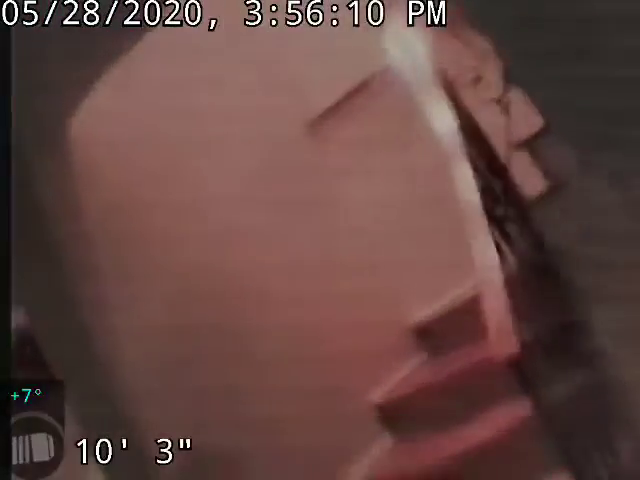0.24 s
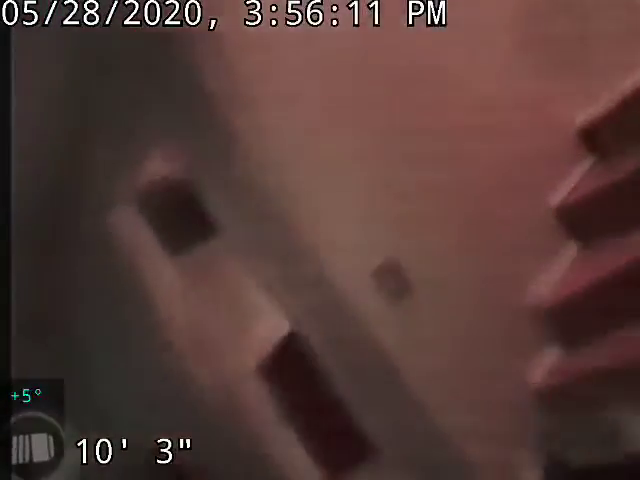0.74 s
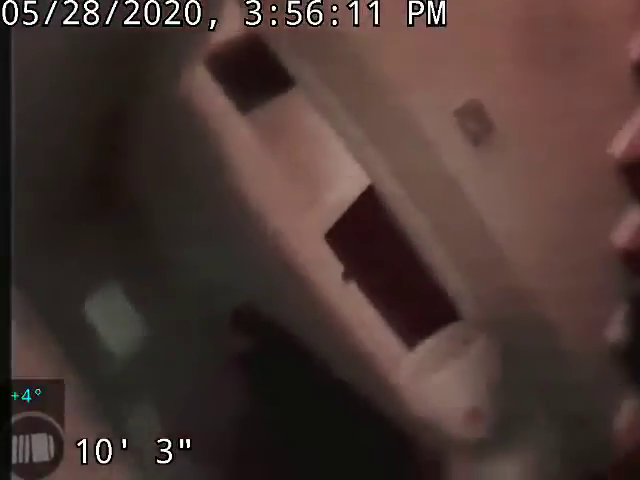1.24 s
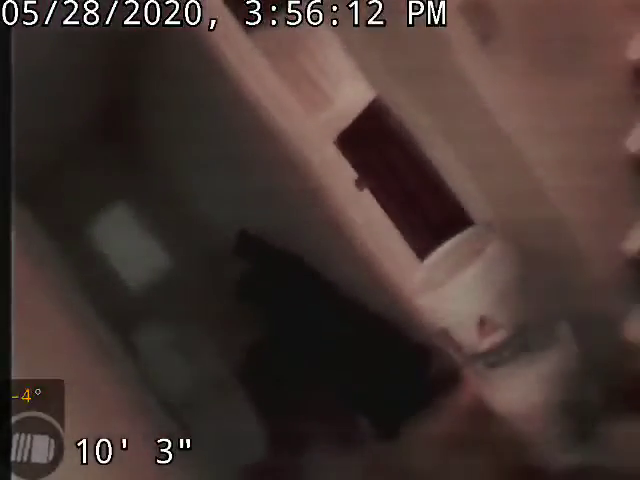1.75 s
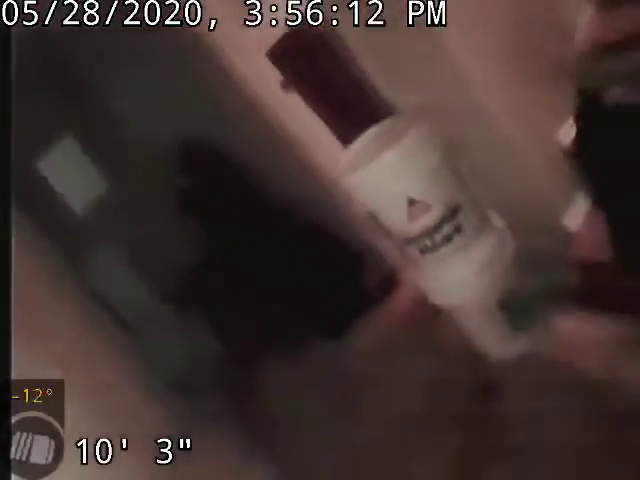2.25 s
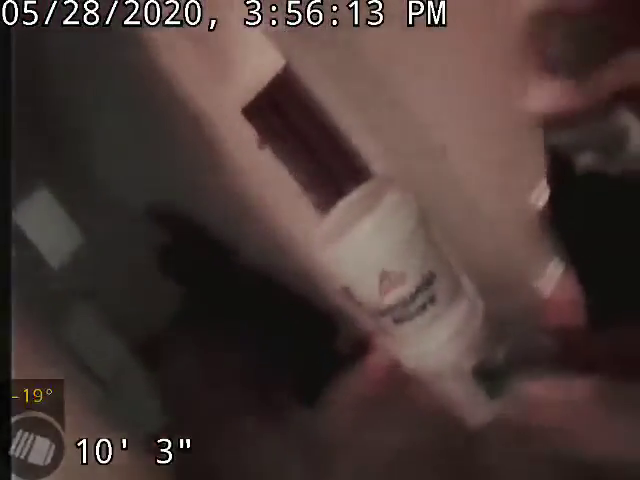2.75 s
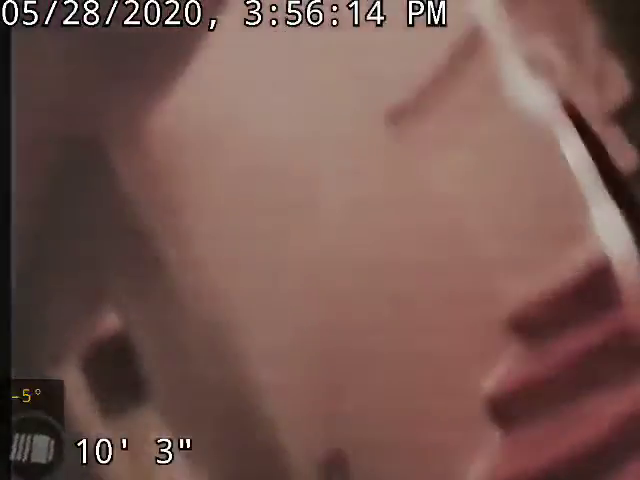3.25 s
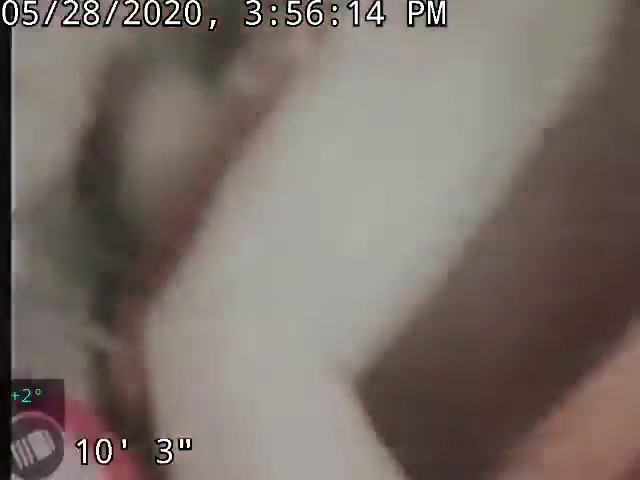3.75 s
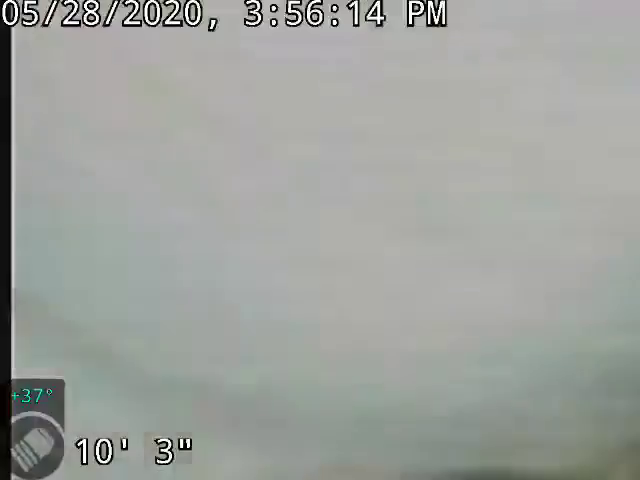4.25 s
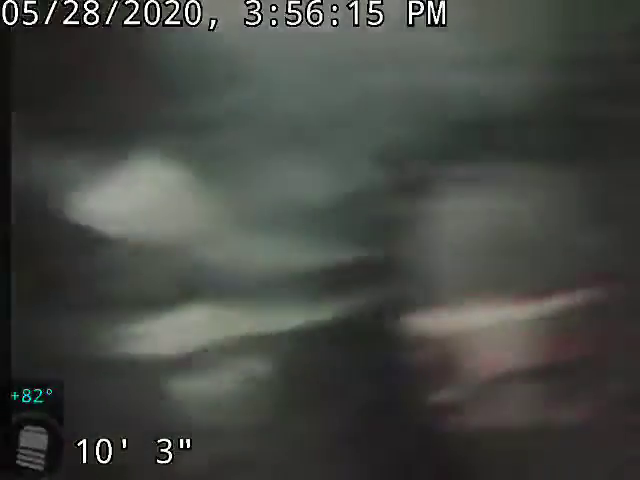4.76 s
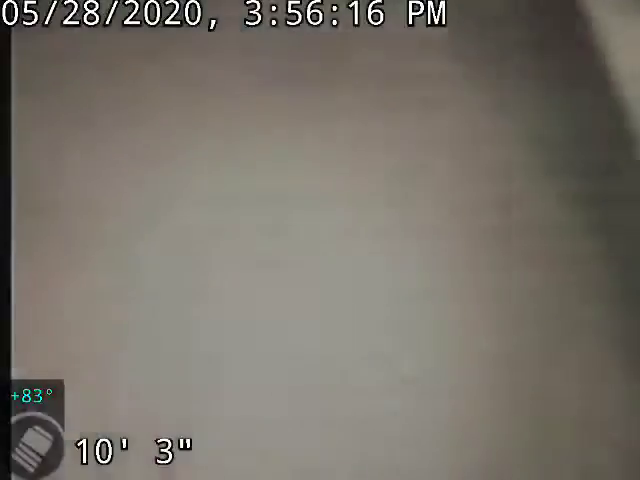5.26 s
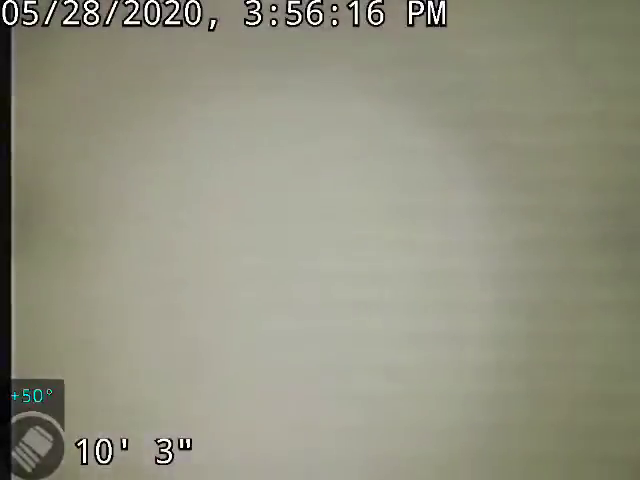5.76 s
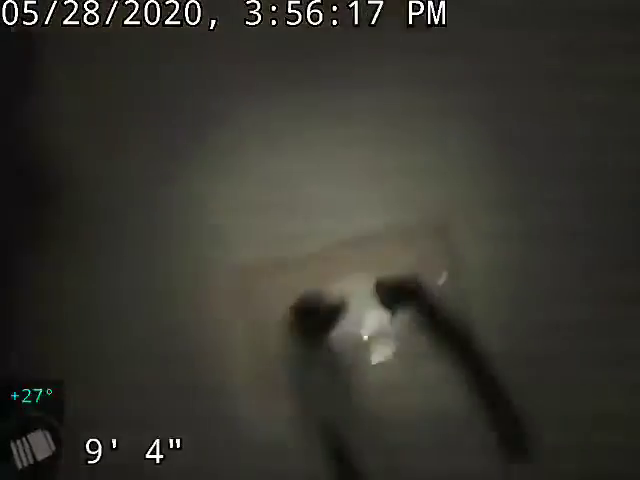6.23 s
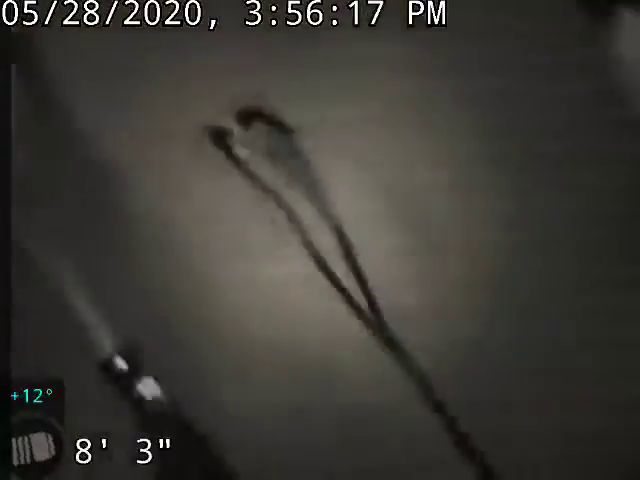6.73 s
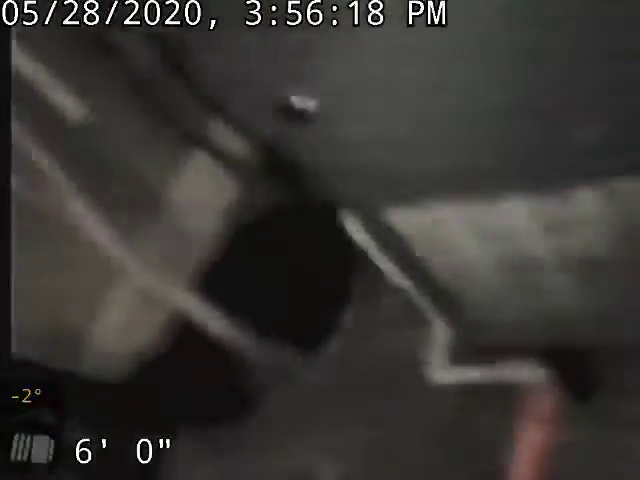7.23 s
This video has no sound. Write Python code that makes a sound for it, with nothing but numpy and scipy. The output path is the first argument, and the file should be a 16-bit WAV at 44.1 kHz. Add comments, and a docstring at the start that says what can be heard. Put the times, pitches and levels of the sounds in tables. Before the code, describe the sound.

A quiet basement room with low mains hum and faint hiss. Tiny dry creaks, then a short dull knock with a brief rattle. After a near-silent pause with small ticks, a stiff cable crashes hard, booming and clattering, and its rumble dies away. Finally the cable is dragged in, rattling, scraping and knocking with growing hiss. One close microphone, dull and bass-heavy.

```python
"""A stiff push cable is handled and dragged back in a quiet basement room, heard at one microphone.
Small creaks and a knock come first, then a heavy, booming crash; the cable scrapes, rattles
and knocks as it is hauled in. Random contacts drive its resonances and noise bands, and decaying
sines make the knocks. Noise makes the boom, ticks, creaks and a faint whirr; mains hum, rumble and
hiss lie behind."""
import sys
import numpy as np
from scipy import signal
from scipy.io import wavfile
from scipy.ndimage import uniform_filter1d

SR = 44100
rng = np.random.default_rng(int(sys.argv[2]) if len(sys.argv) > 2 else 0)


def store_wav(level_fs):
    """Save 16-bit WAV to argv[1]."""
    pcm = np.round(np.clip(np.atleast_2d(level_fs), -1, 1) * 32767)
    wavfile.write(sys.argv[1], SR, pcm.T.astype(np.int16))


N = 330309   # samples, about 7.5 s

# Jolts, after which the cable shakes on and dies away: [t/s, basic t60/s, rattle level/dB,
# rattle centre/octaves above 100 Hz, scrape level/dB, brightness/dB]
JOLTS = [(2.461, 0.38, -30, 1.5, -40.5, -24), (3.45, 0.94, -63, .15, -86, 5),
         (4.241, 1.16, -24, 1.37, -32.5, -4.5), (4.321, 0.77, -23.5, 1.37, -34.5, -6.5),
         (4.695, 1.5, -60, .1, -61, 3), (4.985, 0.48, -48.5, 1.37, -64.5, 9),
         (5.615, 0.28, -47.5, 0.62, -86.5, 5), (6.105, .55, -34, 1.1, -50, -5.6),
         (6.222, 0.41, -30, 1.9, -35, -14.5), (6.262, .45, -31, .6, -53, 0.2),
         (6.509, 0.93, -34, 1.1, -49, -16), (6.994, .6, -34.5, .9, -49, 0.2),
         (7.166, 0.88, -33, 1.83, -44.5, -14)]
# Swells of rattle and scrape, including the lead-in and tail of the crash: [peak t/s, rise/s for 20 dB,
# fall/s for 20 dB (the same for all parts), rattle level/dB, rattle centre/octaves above 100 Hz,
# scrape level/dB, brightness/dB]
SWELLS = [(2.454, 0.04, 0.06, -41.5, 2.5, -57.5, -19), (2.546, 0.05, .07, -53, 1.5, -63.5, 5.5),
          (2.65, .12, .17, -67, 2.5, -81, -6.5), (3.07, 0.05, .21, -66.5, 0.56, -86.5, 15.5),
          (3.42, .4, .35, -71, 1.7, -83, 9), (3.88, 0.37, 0.3, -64.5, 1.94, -70, 9),
          (4.15, 0.36, .15, -71, 1.55, -84, 9), (4.371, .075, 0.0838, -20.5, 2.45, -31.5, -0.3),
          (4.47, .1, .22, -29, 1.1, -51, -5.5), (4.63, 0.23, .48, -31, -.5, -80, 3.2),
          (4.81, 0.23, .36, -64, .36, -58.5, .5), (5.04, 0.45, .2, -61.5, 1.5, -68, 3),
          (5.26, .12, .2, -63, 1.0, -66, -3), (5.45, .22, .185, -53, 1.9, -52.5, 4.7),
          (5.68, 0.12, 0.4, -61, 1.3, -65.5, 4), (5.88, .16, 0.33, -49, 1.4, -57, 4.5),
          (5.97, 0.1645, 0.16, -41.5, 0.8, -59, 6), (6.17, 0.23, 0.6, -42.5, 1.16, -53, 3),
          (6.4, 0.2645, 0.3, -44.5, 1.17, -48.5, 1.7), (6.599, 0.27, 0.23, -38.5, 1.6, -48.5, -6),
          (6.71, 0.2, 0.27, -32, 1.28, -58, 2), (6.85, 0.23, .25, -42, 2.0, -49.5, -3.7),
          (7.1, .16, .085, -39.5, 2.6, -40.5, 8.1), (7.31, 0.25, 0.15, -36, 1.73, -40.5, 2),
          (7.47, 0.6, 5, -53, 2.25, -53, 1)]
# Low, middle and high rattle answering a move: [centre f/Hz, level/dB, share of a jolt's basic t60]
RATTLE_PARTS = [(166.5, 0.8, 1.08), (324, -2.5, 0.84), (601, 0, 0.69)]
# Scrape, hiss and top hiss answering a move: [level/dB, share of the brightness, share of a jolt's basic t60]
RUB_PARTS = [(0.08, 0.0105, 0.49), (-6.5, 0.44, 0.56), (-10, 1.04, 0.55)]
# Tension of the hauled cable, lifting its sharp modes: [t/s, lift/dB]
TENSION = [(5.6, 2), (5.899, 6)]
# Low rumbling boom of the handling: [t/s, level/dB]
BOOM_LEVEL = [(2.34, -66), (2.43, -53), (2.56, -65), (2.8, -83), (2.96, -74), (3.2, -77), (3.45, -56),
              (4.226, -59), (4.244, -26), (4.32, -23.5), (4.45, -28.5), (4.62, -30.5), (4.97, -45),
              (4.99, -38.5), (5.169, -51), (5.62, -60), (5.72, -55), (5.89, -62), (6.15, -50), (6.225, -35),
              (6.38, -48.5), (6.7, -56), (6.95, -52), (6.99, -37), (7.035, -37.5), (7.1, -46), (7.16, -36),
              (7.31, -51.5), (7.49, -48)]
# Bending modes of the cable: [f/Hz, width/Hz, relative level/dB]
CABLE_MODES = [(129.8, 39, -4), (170, 18.6, -1), (247, 118, -8.5), (322, 19.7, -4.5), (405, 106, -7.5),
               (484.2, 15, -9), (553, 85, -5), (646.4, 31, -5), (732, 98, -10.5), (1000, 550, -22.5)]
# Low resonances of the boom: [f/Hz, width/Hz, relative level/dB]
BOOM_MODES = [(55.3, 17.2, 5), (78.3, 34.2, 0.5), (106.2, 21.3, -1)]
# Sheath and housing modes that sing in the scrape: [f/Hz, width/Hz, relative level/dB]
SHEATH_MODES = [(1124, 100, 1.5), (1375, 79, 2.5), (1511, 68, 6.5), (1750, 40, -1), (2124, 370, -20.5),
                (2730, 220, -4.5), (3087, 160, -4), (3780, 260, -8), (4460, 73, -10)]
# Colour of the scrape: [f/Hz, relative level/dB per Hz]
SCRAPE_COLOUR = [(700, -6), (1000, -9), (1600, -5), (2600, -7), (3800, -14), (5500, -29), (8000, -29)]
# Colour of the rubbing hiss: [f/Hz, relative level/dB per Hz]
HISS_COLOUR = [(3200, -2.5), (5000, -5), (7500, -9.5), (8600, -5.5), (10000, -10), (13300, -3.5),
               (14100, -6)]
# Knocks of the cable: [t/s, ring peak level/dB, favoured f/Hz, ring t60/s at that f, crack level/dB re ring]
KNOCKS = [(0.755, -61, 440, 0.28, -14), (2.409, -64, 687, .1, -18), (2.437, -36, 550, 0.1, -18),
          (2.459, -22, 560, 0.11, -6), (3.46, -36, 148, 0.1, -45), (3.652, -47, 326, 0.13, -45),
          (4.237, -25, 130, 0.19, -7.5), (4.324, -17.5, 203, 0.055, 1.5), (4.364, -10.5, 637, 0.21, -5.5),
          (4.392, -9, 179, 0.071, -10), (4.987, -37, 550, 0.13, -21.5), (5.613, -33.5, 231, 0.12, -38),
          (5.978, -25.5, 130, 0.26, -29), (6.103, -32, 400, 0.17, -22), (6.123, -25, 198, 0.21, -10),
          (6.216, -35, 504, 0.064, 13), (6.224, -20, 320, 0.19, -5), (6.296, -19.5, 333, 0.048, -22),
          (6.508, -17.5, 332, 0.056, -10.5), (6.512, -26.5, 166, .2, -30), (6.670, -18, 270, .04, -30),
          (6.69, -27, 198, 0.17, -25), (6.742, -22.5, 320, .05, -25), (6.994, -23.5, 540, 0.063, -20),
          (7.165, -21.5, 133, 0.056, -7)]
# Small creaks, each a hissy ring in one band: [t/s, ring level/dB, f/Hz, width/Hz, t60/s]
CREAKS = [(0.026, -70, 3300, 2000, 0.24), (0.031, -74.5, 8350, 2010, 0.46), (.088, -72.5, 6100, 600, 0.31),
          (0.134, -64, 3630, 200, 0.23), (0.169, -60, 5900, 1180, 0.15), (.2, -75, 4130, 503, 0.33),
          (0.391, -71.5, 8100, 1500, 0.26), (0.753, -70.5, 2530, 3700, 0.28),
          (0.758, -73, 8000, 3040, 0.31), (0.824, -74, 3670, 400, 0.29), (0.954, -62, 3680, 221, 0.19),
          (1.008, -68.5, 6200, 815, 0.24), (1.206, -68.5, 10100, 5130, .2), (1.369, -75, 8350, 2000, 0.19),
          (1.455, -79, 11500, 2500, .25), (1.784, -75, 4900, 700, .25), (2.189, -77, 5400, 800, 0.17),
          (2.345, -84, 4170, 300, 0.44), (2.61, -56.5, 3590, 250, 0.13), (2.836, -76, 3950, 450, 0.36),
          (2.961, -78, 10500, 4030, 0.79), (3.44, -77, 4400, 500, 0.49), (3.52, -73, 7170, 700, 0.29),
          (4.325, -26, 1370, 895, 0.11), (4.364, -27, 4370, 250, 0.056), (4.695, -48.5, 2560, 302, 0.16),
          (4.698, -57.5, 3570, 377, 0.091)]
# Sharp ticks: [t/s, peak level/dB, low edge f/Hz]
TICKS = [(0.8974, -66, 7000), (3.054, -51, 7000), (3.308, -53, 7100), (3.3797, -58, 7000),
         (3.6306, -51, 7000), (3.723, -46, 7000), (3.7569, -46, 7000), (3.8132, -48, 7000),
         (4.019, -49, 7000), (5.7007, -37, 1500), (5.9574, -35, 7000), (5.975, -29, 7200),
         (7.17, -24, 2800), (7.1844, -43, 2800)]
# Faint whirring band near 1.1 kHz: [t/s, level/dB]
WHIRR_LEVEL = [(3.0, -100), (3.2, -84.5), (3.6, -84.5), (3.8, -82), (3.95, -69), (4.201, -77.5),
               (4.26, -100)]
# Mains lines: [f/Hz, middle rms level/dB, waver/dB]
HUM = [(59.5, -60, 1.5), (120, -77, 1.5), (178, -81, 1.5), (716, -92, 1.5)]
# Colour of the room's rumble and the preamplifier's hiss: [f/Hz, relative level/dB per Hz]
FLOOR_COLOUR = [(13, -32), (22, -19.5), (43, -8.5), (70, -9), (108, -6.5), (161, -10.5), (308, -24),
                (437, -40), (637, -32), (709, -33), (979, -41.5), (3570, -44.5), (5340, -47),
                (11700, -47.5), (13700, -46.5)]

JOLT_RISE_S = 0.0039   # for 20 dB
SWELL_ROUNDNESS = 1.43   # 1 = pointed peak, 2 = bell
RATTLE_FOCUS_DB = 7.5   # loss per octave away from the rattle centre
CREAK_SNAP_DB, SNAP_T60_S = -4.5, 0.0088   # noise of the snap before its filters, re the ring
FLOOR_DB = -67
MIC_LOW_HZ, CUTOFF_HZ = 42.4, 14300   # bass corner; edge above which the treble is 65 dB down


def drag():
    """Handling booms low down, slips shake the cable modes, and the sheath scrapes and hisses."""
    low, middle, high, rub, sizzle, top = motion()
    t = np.arange(N) / SR
    boom = from_db(np.interp(t, *np.transpose(BOOM_LEVEL), left=-120))
    thud = low_pass(boom * boom_tone(), 235)

    taut_db = np.interp(t, *np.transpose(TENSION))
    slips = grains(700.0, spread_db=1.0)
    low_modes = body(slips, CABLE_MODES[:3], wander_db=1.1, taut_db=taut_db)
    low_modes = rms_one(low_pass(low_modes, 320))
    middle_modes = body(slips, CABLE_MODES[3:5], wander_db=2.6, taut_db=taut_db)
    middle_modes = rms_one(resonate(middle_modes, 293, 225))
    high_modes = body(slips, CABLE_MODES[5:], wander_db=2.5, taut_db=taut_db)
    high_modes = rms_one(high_pass(high_modes, 357))
    rattle = low * low_modes + middle * middle_modes + high * high_modes
    rattle = low_pass(rattle, 1830)   # soft contacts: little treble

    judder = drift(20.0)   # stick and slip throbs scrape and hiss together
    grit = [grains(1800.0, spread_db=2.0) for _ in range(2)]
    singing = body(grit[0], SHEATH_MODES, wander_db=1.0)
    scrape = coloured(grit, SCRAPE_COLOUR, patchy_db=1.5) + 0.52 * singing
    scrape = rub * rms_one(high_pass(scrape, 960))

    fine_grit = [grains(9000.0, spread_db=2.5) for _ in range(2)]
    hiss = coloured(fine_grit, HISS_COLOUR, patchy_db=1.77)
    hiss = sizzle * rms_one(low_pass(hiss, 8420)) + top * rms_one(high_pass(hiss, 9200))
    return thud + rattle + from_db(0.99 * judder) * scrape + from_db(0.35 * judder) * hiss


def motion():
    """Gains of three rattle and three rubbing parts: every move rises, peaks and fades; powers add."""
    centre_hz, rattle_db, rattle_lasts = np.transpose(RATTLE_PARTS)
    rub_db, follows, rub_lasts = np.transpose(RUB_PARTS)
    centre = np.log2(centre_hz / 100)
    lasts = np.concatenate([rattle_lasts, rub_lasts])[:, None]
    # a jolt's t60 covers three falls of 20 dB; its fall is straight in dB
    moves = [(s, JOLT_RISE_S, t60 / 3 * lasts, *rest, 1) for s, t60, *rest in JOLTS]
    # a swell's fall is the same for all parts
    moves += [(*swell, SWELL_ROUNDNESS) for swell in SWELLS]
    t = np.arange(0, N + 32, 32) / SR   # every 32nd sample is enough
    power = 0
    for s, rise, fall, shake_db, octave, scrape_db, bright_db, roundness in moves:
        rattle_peak_db = shake_db + rattle_db - RATTLE_FOCUS_DB * np.abs(centre - octave)
        rub_peak_db = scrape_db + rub_db + follows * bright_db
        peak_db = np.concatenate([rattle_peak_db, rub_peak_db])
        before = (s - t) / np.maximum(rise, 1e-3)
        after = (t - s) / np.maximum(fall, 1e-3)
        shape_db = -20 * np.maximum(before, after) ** roundness
        power = power + from_db(peak_db[:, None] + shape_db) ** 2
    return [np.interp(np.arange(N) / SR, t, part) for part in np.sqrt(power)]


def boom_tone():
    """Low resonances under a steady shaking by noise, their slow swells half evened out."""
    ring = body(rng.standard_normal(N), BOOM_MODES, wander_db=.5)
    swell_power = uniform_filter1d(ring ** 2, size=SR // 12) + 1e-3
    return rms_one(ring / swell_power ** .25)


def knocks():
    """Each blow rings the cable modes near its favoured pitch and cracks the sheath modes briefly."""
    out, t = np.zeros(N), np.arange(SR // 3) / SR
    hz, _, mode_db = np.transpose(CABLE_MODES)
    thin_hz, _, thin_db = np.transpose(SHEATH_MODES)
    cable_tones = np.sin(2 * np.pi * hz[:, None] * t)
    sheath_tones = np.sin(2 * np.pi * thin_hz[:, None] * t)
    chance = rng.standard_normal((len(KNOCKS), len(hz) + len(thin_hz)))
    for (s, db, best_hz, t60, crack_db), luck in zip(KNOCKS, chance):
        octaves_off = np.abs(np.log2(hz / best_hz))
        strength_db = mode_db - 21.0 * octaves_off + 2.0 * luck[:len(hz)]
        fade_db = -60 * t / t60 * np.sqrt(hz[:, None] / best_hz)   # low modes last longer
        rings = from_db(strength_db) @ (cable_tones * from_db(fade_db))
        rings = low_pass(rings, 3.26 * best_hz)   # a dull blow has a long contact
        crack = from_db(thin_db + 1.1 * luck[len(hz):]) @ sheath_tones
        crack = crack * from_db(-60 * t / 0.014)
        blow = rings / np.abs(rings).max() + from_db(crack_db) * crack / np.abs(crack).max()
        span, sound = place(out, s, from_db(db) * blow)
        out[span] += sound
    return out


def creaks():
    """Noise in one steep band, with a broader snap at its sudden start and a tail carried by the room."""
    out, t = np.zeros(N), np.arange(SR // 2) / SR
    noises = rng.standard_normal((len(CREAKS), len(t)))
    for (s, db, hz, width_hz, t60), noise in zip(CREAKS, noises):
        edges = np.clip([hz - width_hz / 2, hz + width_hz / 2], 100, 15000)
        band = rms_one(signal.sosfilt(signal.butter(3, edges, "band", fs=SR, output="sos"), noise))
        ring = from_db(-60 * t / t60) * band * (1 - np.exp(-t / 0.00046))
        snap = noise * from_db(CREAK_SNAP_DB - 60 * t / SNAP_T60_S)
        snap = high_pass(snap, edges[0] * 0.54, order=2)
        snap = low_pass(snap, edges[1] * 1.5, order=2)
        span, sound = place(out, s, from_db(db) * (snap + ring))
        out[span] += sound
    return out


def ticks():
    """A few milliseconds of bright, decaying noise for each tick."""
    out, t = np.zeros(N), np.arange(SR // 20) / SR
    noises = rng.standard_normal((len(TICKS), len(t)))
    for (s, db, low_hz), noise in zip(TICKS, noises):
        tick = high_pass(noise * from_db(-60 * t / 0.011), low_hz, order=2)
        span, sound = place(out, s, from_db(db) * tick / np.abs(tick).max())
        out[span] += sound
    return out


def whirr():
    """Smooth noise through two neighbouring resonances, one after the other."""
    s, db = np.transpose(WHIRR_LEVEL)
    level_db = np.interp(np.arange(N) / SR, s, db, left=-120, right=-120)
    band = resonate(resonate(rng.standard_normal(N), 1120, 260), 1050, 290)
    return from_db(level_db) * rms_one(band)


def room_tone():
    """Mains lines wavering in level and phase over a dull rumble and the preamplifier's hiss."""
    t, hum = np.arange(N) / SR, 0
    for hz, db, waver_db in HUM:
        level = np.sqrt(2) * from_db(db + waver_db * drift(2.9))   # rms to peak
        hum = hum + level * np.sin(2 * np.pi * hz * t + 0.35 * drift(6.3))
    floor = coloured(rng.standard_normal((2, N)), FLOOR_COLOUR, patchy_db=3.0)
    return hum + from_db(FLOOR_DB) * floor


def grains(per_s, spread_db):
    """Random contacts of uneven size and sign."""
    sizes = from_db(spread_db * np.minimum(rng.exponential(1, N), 5)) * rng.choice([-1, 1], N)
    return sizes * (rng.random(N) < per_s / SR) + 1e-18


def body(x, modes, wander_db, taut_db=0):
    """Parallel resonances of alternating sign and wandering level; tension lifts the sharp ones."""
    out = 0
    for k, (hz, width_hz, db) in enumerate(modes):
        # in the cable, the moving contact point favours now one mode, now another
        level_db = db + wander_db * drift(8.0) + taut_db * (width_hz < 33)
        out = out + (-1) ** k * from_db(level_db) * resonate(x, hz, width_hz)
    return rms_one(out)


def resonate(x, hz, width_hz):
    """One resonance with gain 1 on top."""
    r = np.exp(-np.pi * width_hz / SR)
    zeros = np.array([1, 0, -1]) * (1 - r * r) / 2
    poles = [1, -2 * r * np.cos(2 * np.pi * hz / SR), r * r]
    return signal.lfilter(zeros, poles, x)


def coloured(source, spectrum, patchy_db):
    """Third-octave bands taken from two sources in turn, each with its own level and flicker; rms 1."""
    hz, db = np.transpose(spectrum)
    edges = hz[0] * 2 ** np.arange(0, np.log2(hz[-1] / hz[0]) + .3, 1 / 3)
    out = 0
    for k, (low, high) in enumerate(zip(edges, edges[1:])):
        band = signal.sosfilt(signal.butter(2, [low, high], "band", fs=SR, output="sos"), source[k % 2])
        level_db = np.interp(np.log(low * high) / 2, np.log(hz), db)
        out = out + from_db(level_db + patchy_db * drift(11.0)) * band
    return rms_one(out)


def drift(rate_hz):
    """Slow chance: noise through a double one-pole low-pass, rms 1."""
    r = np.exp(-80 * np.pi * rate_hz / SR)   # one step is 40 samples
    noise = rng.standard_normal(N // 40 + 2002)
    slow = signal.lfilter([1], [1, -2 * r, r * r], noise)[2000:]   # settled part
    return np.interp(np.arange(N) / 40, np.arange(len(slow)), rms_one(slow))


def place(out, s, sound):
    """Where a sound starting at s seconds falls, and the part of it that fits."""
    i = round(s * SR)
    return slice(i, i + len(sound)), sound[:len(out) - i]


def low_pass(x, hz, order=4):
    """Butterworth low-pass."""
    return signal.sosfilt(signal.butter(order, hz, fs=SR, output="sos"), x)


def high_pass(x, hz, order=4):
    """Butterworth high-pass."""
    return signal.sosfilt(signal.butter(order, hz, "high", fs=SR, output="sos"), x)


def from_db(db):
    """Gain of a level in dB."""
    return 10 ** (np.asarray(db) / 20)


def rms_one(x):
    """Scaled to unit rms."""
    return x / np.sqrt(np.mean(x ** 2) + 1e-20)


def scene():
    """All sources in the room, summed at one microphone."""
    return (drag() + knocks() + creaks() + ticks() + whirr() + room_tone())[None]


def record(dry):
    """The microphone drops the deepest bass; the top is cut steeply."""
    without_bass = high_pass(dry, MIC_LOW_HZ)
    return signal.sosfilt(signal.cheby2(26, 65, CUTOFF_HZ, fs=SR, output="sos"), without_bass)


dry = scene()
out = record(dry)
store_wav(out)
```